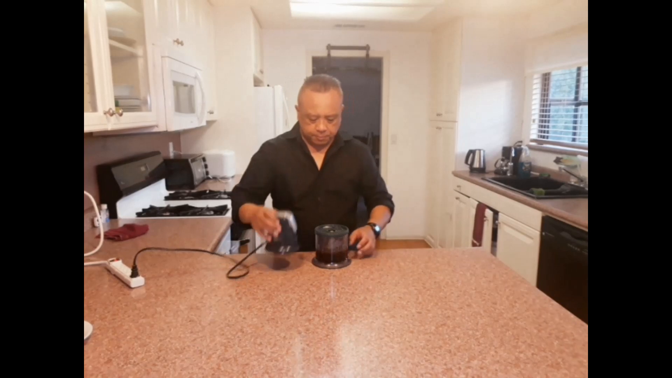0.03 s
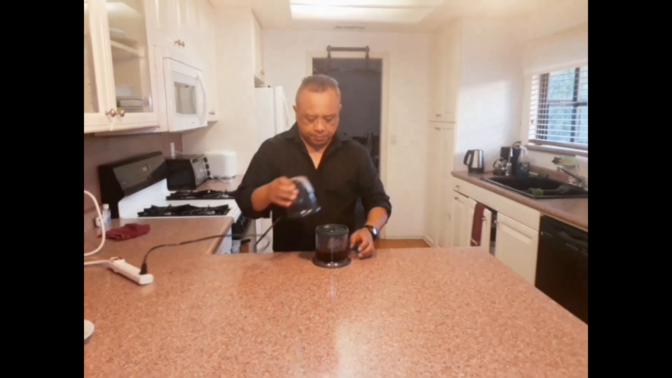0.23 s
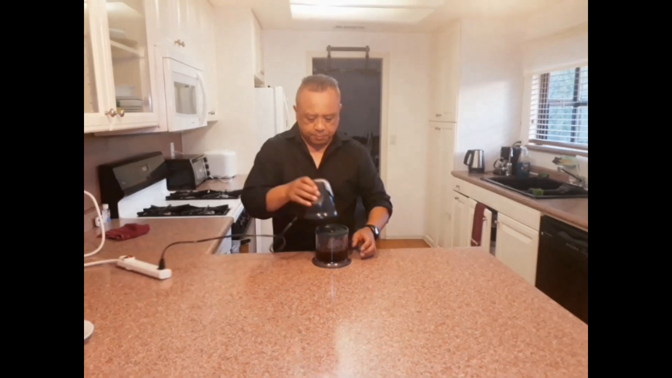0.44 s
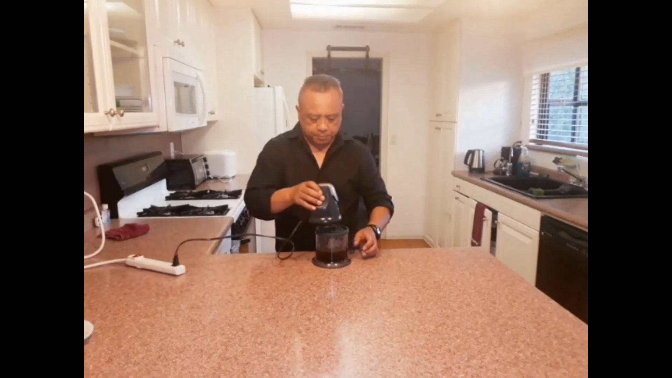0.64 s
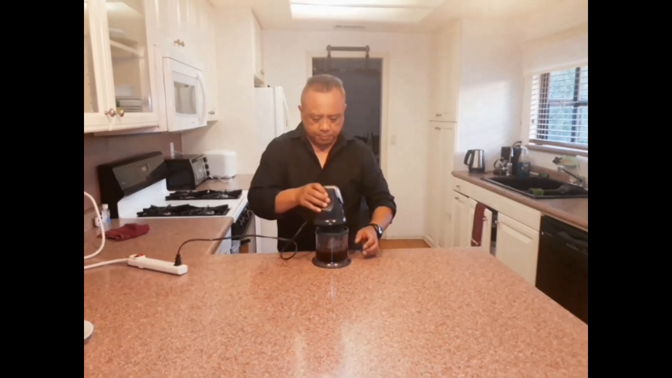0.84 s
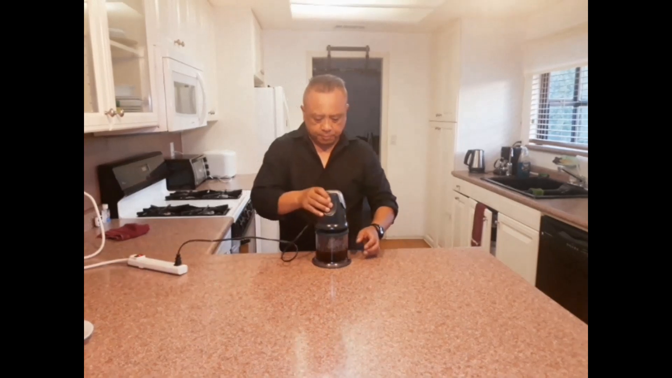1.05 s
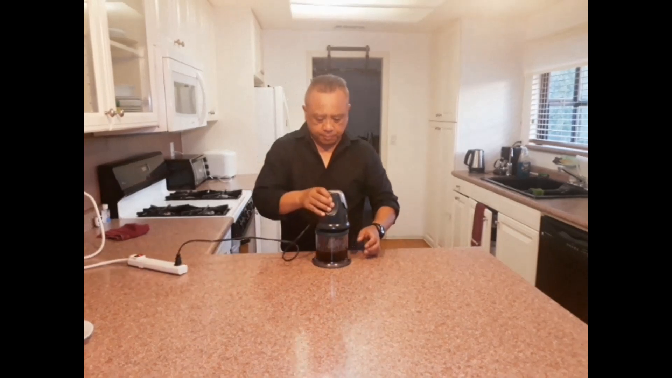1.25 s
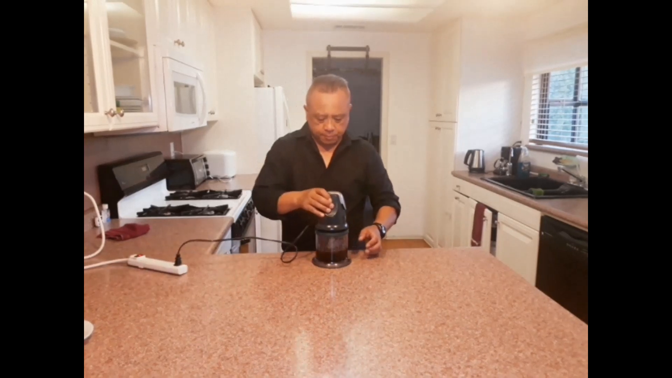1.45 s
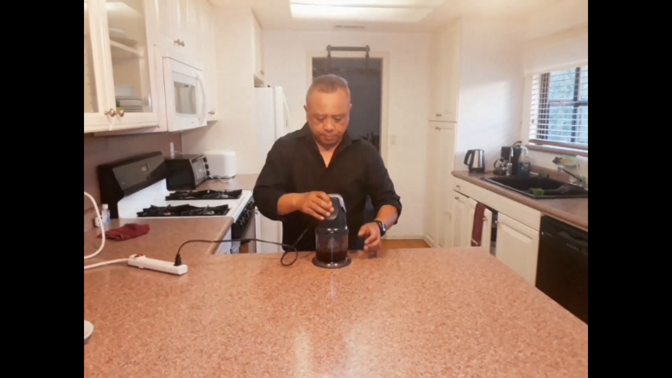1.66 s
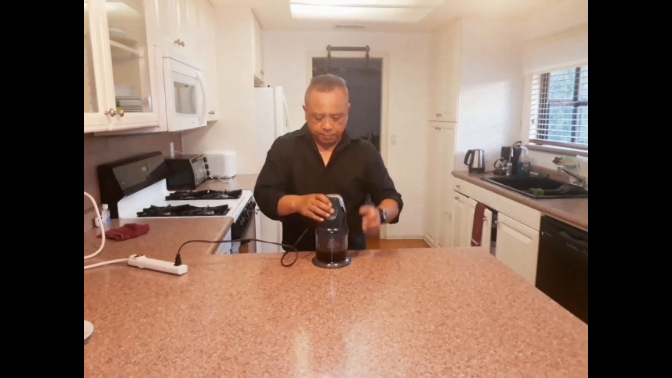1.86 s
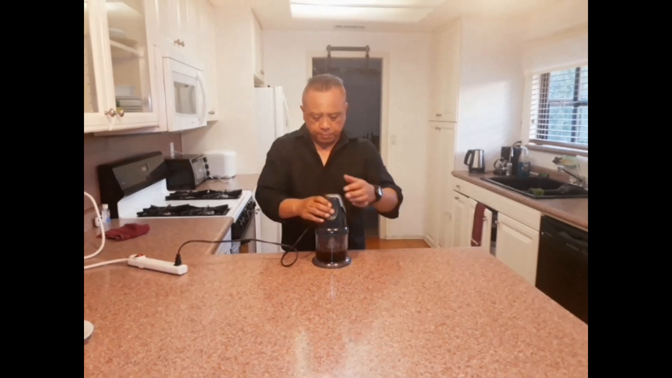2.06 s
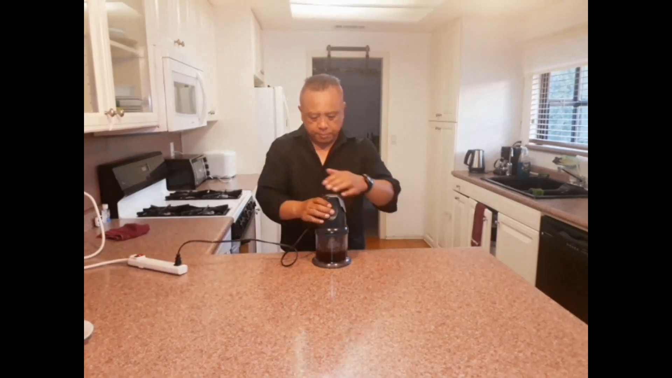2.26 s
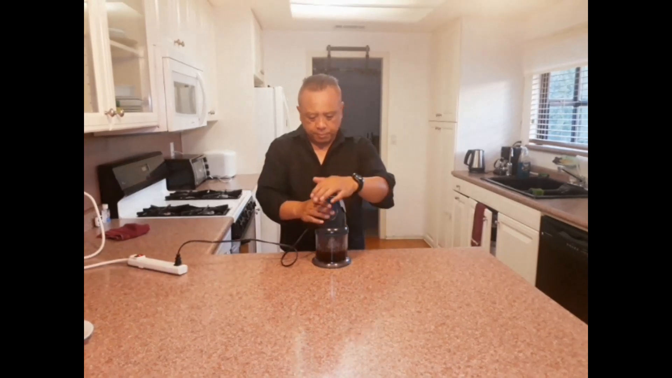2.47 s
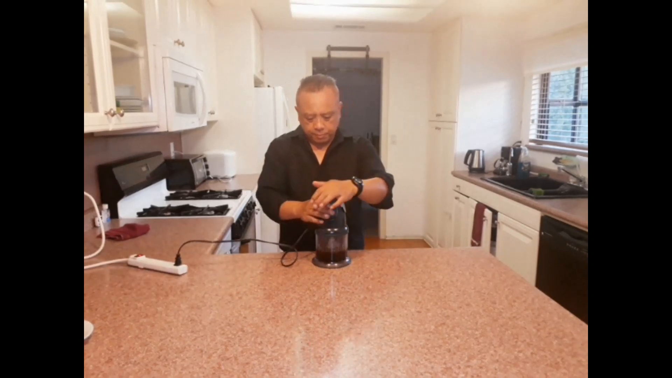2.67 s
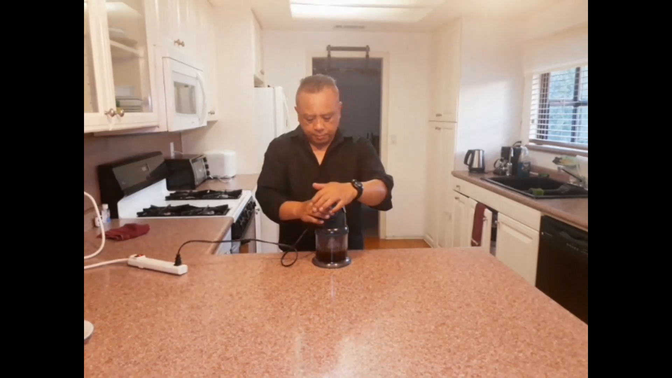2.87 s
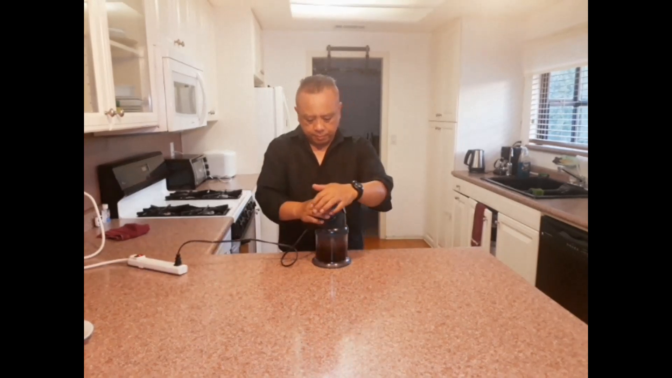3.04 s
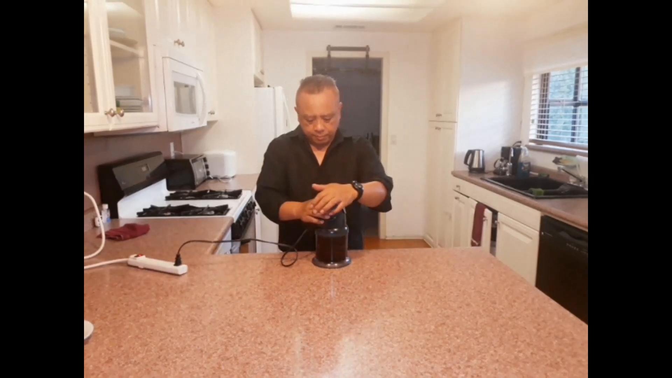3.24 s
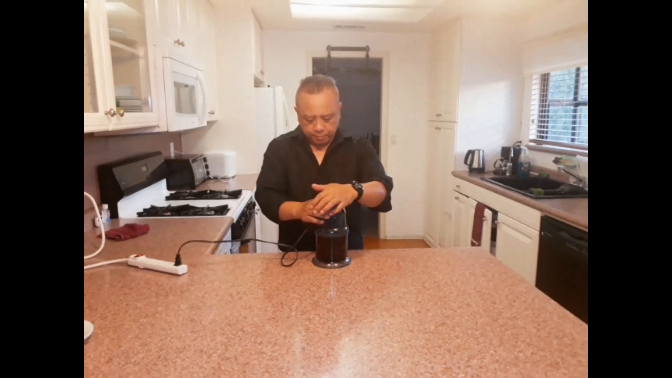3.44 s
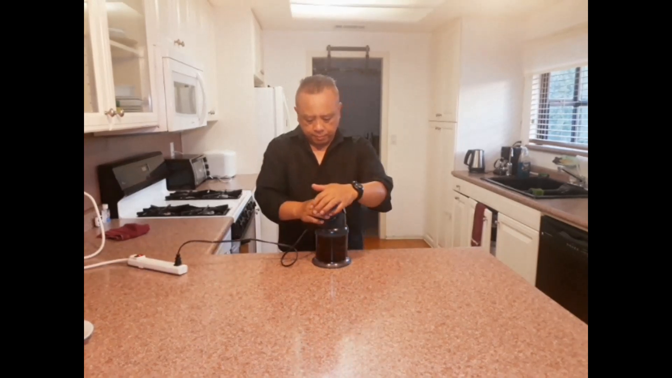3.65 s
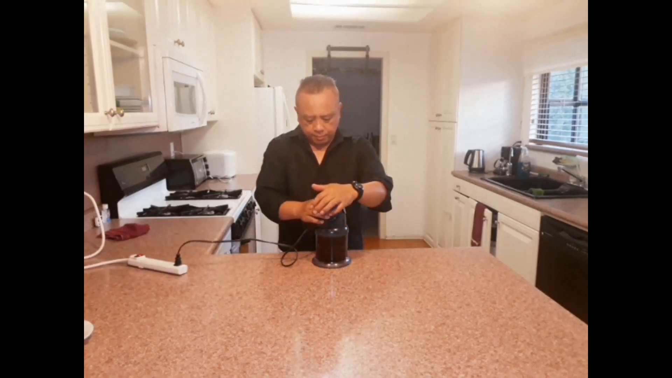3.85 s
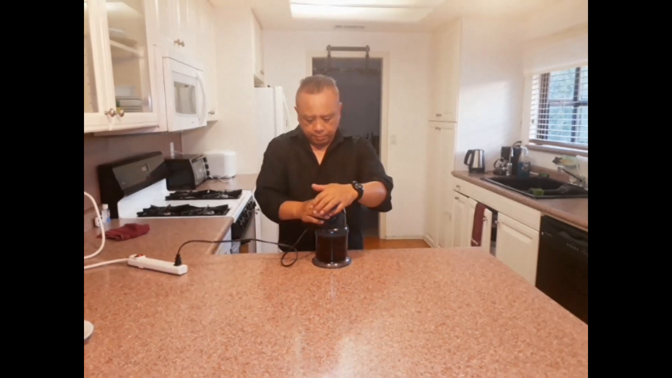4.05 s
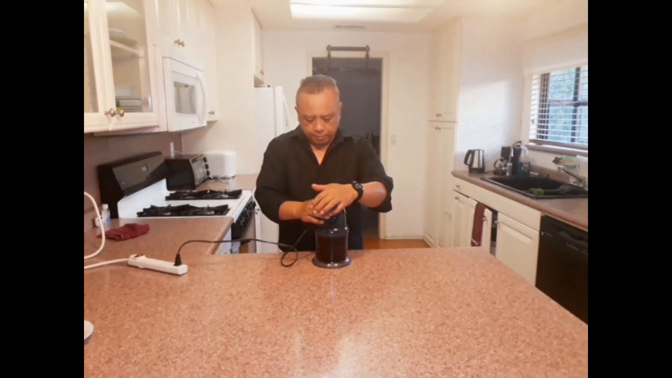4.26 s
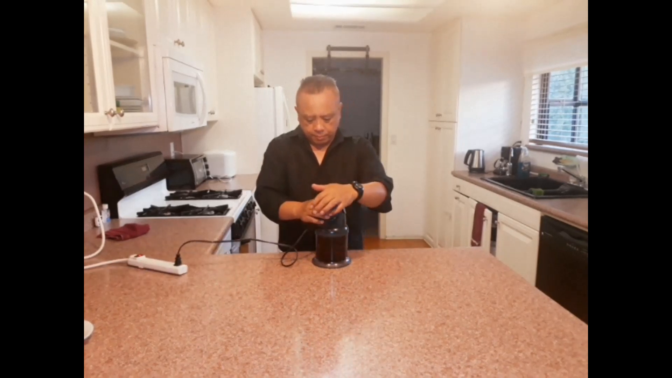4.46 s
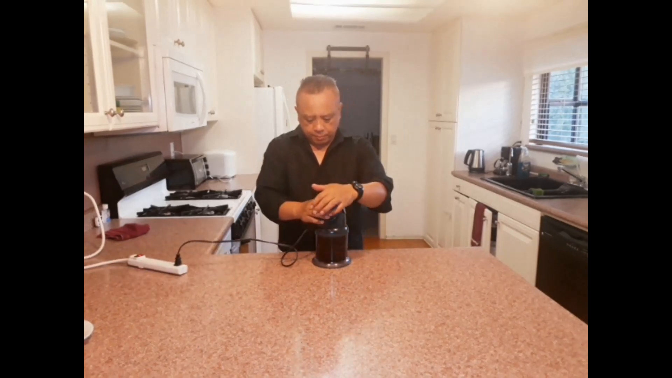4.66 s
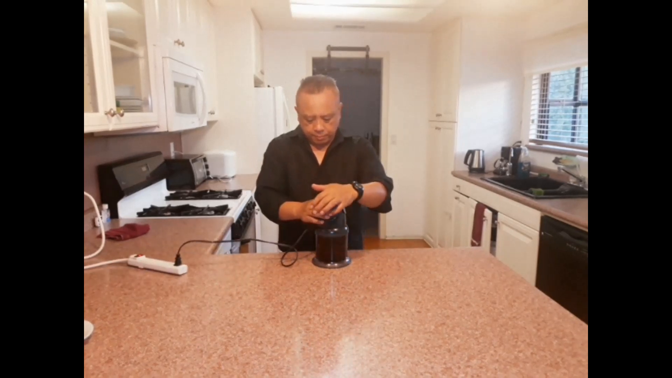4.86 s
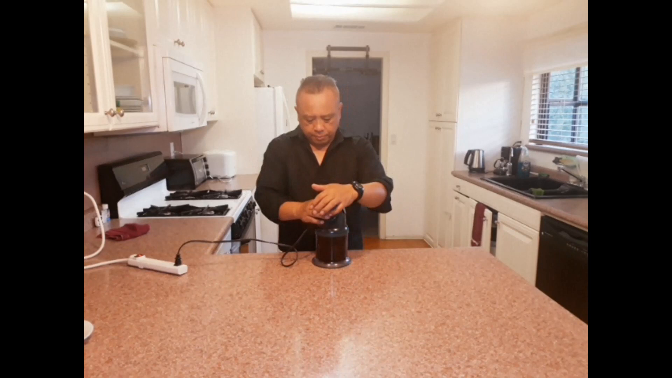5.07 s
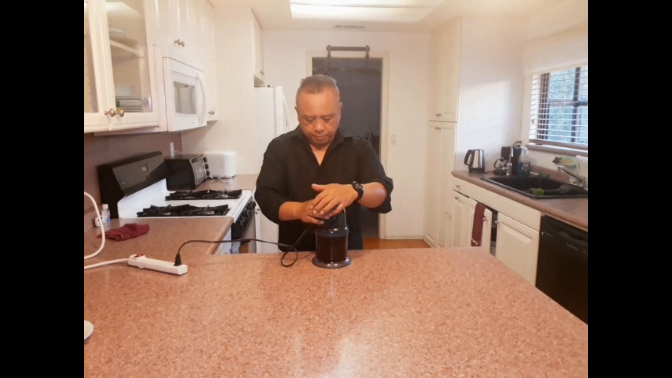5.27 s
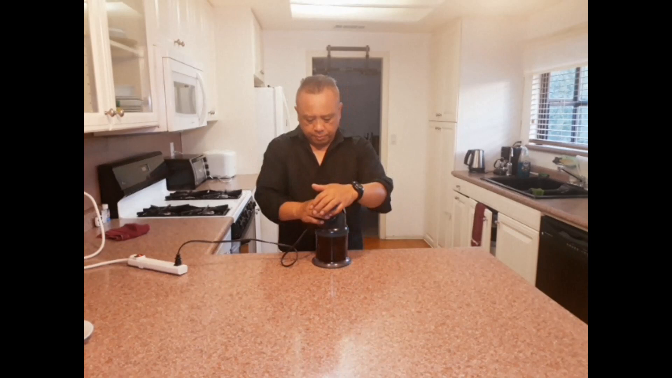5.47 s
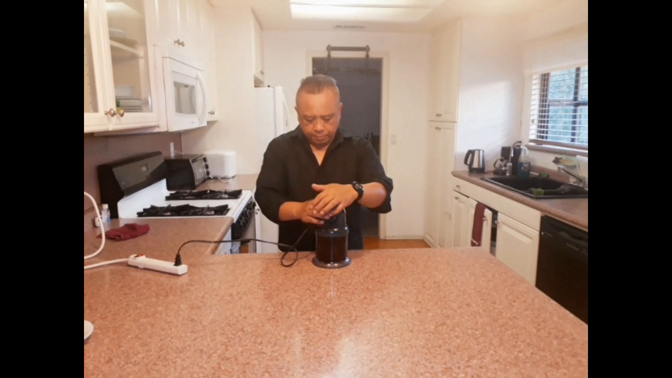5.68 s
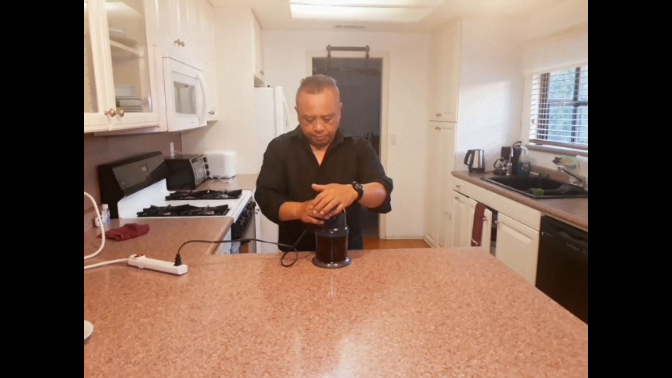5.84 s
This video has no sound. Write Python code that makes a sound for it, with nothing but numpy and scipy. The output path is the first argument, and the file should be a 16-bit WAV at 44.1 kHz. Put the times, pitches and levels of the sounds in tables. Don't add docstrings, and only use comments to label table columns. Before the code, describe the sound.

Heard from a few metres in a small hard-walled room: a brief cable rub, several clustered plastic thumps and clicks with short reflections, then near-quiet over distant appliance drone. A couple of tiny creaks and taps lead into a geared chopper motor, spinning up quickly into a loud harsh buzz with low hum, gritty gear whine, rushing air and churning food. It is still running at the end.

```python
import sys
import numpy as np
from scipy import signal
from scipy.fft import rfft, irfft, next_fast_len
from scipy.io import wavfile
from scipy.ndimage import uniform_filter1d, map_coordinates

SR = 44100
rng = np.random.default_rng(int(sys.argv[2]) if len(sys.argv) > 2 else 0)


def gain_from_decibels(decibels):
    exponent = np.asarray(decibels, float) / 20
    return 10 ** exponent


def bounce(signal):
    frames = np.transpose(np.atleast_2d(signal))
    limited = np.clip(frames, -1, 1)
    pcm = np.round(limited * 32767).astype(np.int16)
    wavfile.write(sys.argv[1], SR, pcm)


N = 260631
T = np.arange(N) / SR


def unit(x):
    return x / np.sqrt(np.mean(np.abs(x) ** 2) + 1e-20)


def along(points, hz):
    f, value = np.transpose(points)
    return np.interp(np.log(hz + 1), np.log(f + 1), value)


def wobble(rate, channels=1):
    knots = int(N * rate / SR) + 4
    return np.array([map_coordinates(rng.standard_normal(knots), [T * rate]) for _ in range(channels)])


def swells(rows):
    return sum(height * np.exp(-((T - s) / half) ** 2) for s, height, half in rows)


def filtered(x, response):
    m = next_fast_len(N + SR // 2)
    return irfft(rfft(x, m) * response(np.fft.rfftfreq(m, 1 / SR)), m)[..., :N]


def modes(table, f):
    return sum((-1) ** k * gain_from_decibels(db) * 1j * f * w / (c * c - f * f + 1j * f * w)
               for k, (c, w, db) in enumerate(table))


# frequency in Hz, left-right likeness from 0 to 1.
LIKENESS = [(60, 0.089), (150, 0.95), (380, 0.76), (950, 0.051), (2380, 0.455), (5980, 0.01), (15000, 0.02)]


def paired(two):
    turn = lambda hz: np.arccos(np.clip(along(LIKENESS, hz), -1, 1)) / 2
    mid, side = filtered(two, lambda hz: np.array([np.cos(turn(hz)), np.sin(turn(hz))]))
    return np.array([mid + side, mid - side])


def rush(spectrum, patchy_db):
    z = signal.stft(rng.standard_normal((2, N)), nperseg=512)[2]
    field = uniform_filter1d(rng.standard_normal(z.shape[1:]), size=6, axis=0)
    field = uniform_filter1d(field, size=10, axis=1)
    two = signal.istft(z * gain_from_decibels(patchy_db * unit(field)), nperseg=512)[1][:, :N]
    low_cut = lambda hz: np.minimum(1, 1.5 * hz / spectrum[0][0]) ** 2
    return unit(paired(filtered(two, lambda hz: gain_from_decibels(along(spectrum, hz)) * low_cut(hz))))


# frequency in Hz, density in dB per Hz.
RUMBLE = [(13, -76.5), (25, -46), (60, -15.5), (110, -12.5), (170, -10), (350, -8), (550, -15.5),
          (1200, -26), (1560, -54), (2640, -120)]
# frequency in Hz, width in Hz, level in dB.
ROOM_MODES = [(122, 14, -2), (172, 18, -2), (245, 16, 2), (352, 18, 2), (420, 16, -3), (512, 16, 1),
              (650, 25, -1)]
# frequency in Hz, density in dB per Hz.
MIC_HISS = [(600, -3), (1000, -1), (1800, -5), (2200, -13), (3200, -15.5), (4500, -11.5), (7600, -12),
            (8200, -28.5), (15800, -21)]


def room_tone():
    drone = filtered(rush(RUMBLE, patchy_db=.4), lambda f: 1 + .8 * np.abs(modes(ROOM_MODES, f)))
    return gain_from_decibels(-52 + 0.37 * wobble(2.56)) * unit(drone) + gain_from_decibels(-64.5) * rush(MIC_HISS, patchy_db=1.3)


# middle in seconds, scrape level in dB, half length in seconds.
CORD_PULLS = [
    (.1, -66, 0.0544),
    (0.471, -50.5, 0.1788),
]


def pulls(lead_s):
    return sum(gain_from_decibels(db) * np.exp(-((T + lead_s - s) / half) ** 2) for s, db, half in CORD_PULLS)


# frequency in Hz, density in dB per Hz.
CORD_SCRAPE = [(290, -32), (500, -5), (766, 5), (937, -8), (1060, -5), (1390, -7), (2120, -6.5), (2420, -3),
               (2690, -7), (4870, -8.5), (8500, -19.5), (11000, -51.5), (18700, -120)]


def cord():
    sizzle_strength = unit(pulls(lead_s=.03) ** 1.56)
    sizzle_strength = gain_from_decibels(-56.5) * sizzle_strength / sizzle_strength.max()
    grain = unit(gain_from_decibels(1.3 * wobble(153.5) + 0.3 * wobble(24)))
    sizzle = rush([(7000, -40), (9000, -4), (12000, -7), (15000, 5), (16000, -2.0)], patchy_db=-1)
    scrape = pulls(0) * gain_from_decibels(2.5) * rush(CORD_SCRAPE, patchy_db=1.5)
    return grain * (scrape + sizzle_strength * sizzle)


# start in seconds, peak level in dB, frequency in Hz.
CREAKS = [
    (0.0654, -52.5, 7250),
    (2.6254, -49, 7300),
    (2.9113, -55.5, 7020),
]


def creaks():
    out, t = np.zeros(N), np.arange(SR // 40) / SR
    for s, db, hz in CREAKS:
        flutter = np.cumsum(rng.normal(0, 0.14, len(t)))
        tick = np.sin(2 * np.pi * hz * t + flutter) * np.minimum(t / .0015, 1)
        out[round(s * SR):][:len(t)] += gain_from_decibels(db + 5 - 60 * t / 0.012) * tick
    return out * gain_from_decibels([[2.5], [-6]])


# start in seconds, thump level in dB, click level in dB,
# hardness as top frequency in Hz, scrape length in seconds.
CONTACTS = [(1.117, -34.5, -46, 1100, 0.014), (1.135, -42.5, -57, 900, 0.013),
            (1.167, -39.5, -64.5, 800, .012), (1.422, -38, -57, 900, .02), (1.439, -36, -48, 1410, 0.018),
            (1.464, -23.5, -51, 1200, 0.016), (1.474, -19.5, -44.5, 2390, 0.053),
            (1.467, -55.5, -60, 7000, 0.033), (1.495, -26, -66, 2000, 0.012),
            (1.649, -39, -37.5, 15000, 0.077), (1.666, -27.5, -38, 15000, 0.0243),
            (1.702, -24.5, -28.5, 5200, 0.01135), (1.716, -44, -46.5, 14000, 0.068),
            (1.734, -34, -37.5, 2650, 0.0091), (2.809, -59, -57.5, 3600, 0.0198),
            (2.824, -49, -60.5, 2500, .04), (3.002, -37, -43, 2000, 0.025)]
# frequency in Hz, gain in dB.
PLASTIC_TONE = [(300, -1), (700, 8.5), (1000, 0.5), (1350, 1.5), (2000, -0.5), (2800, -5.5), (3800, 2),
                (6700, -6), (8900, -20), (12000, -12.5), (16000, -13.5)]
# frequency in Hz, width in Hz, level in dB.
WORKTOP = [(45, 40, -19), (80, 30, -11), (150, 40, -12), (213, 25, -8), (325, 24, 0), (560, 70, -15),
           (1100, 300, -28)]


def knocks():
    clicks, blows, t = np.zeros(N + SR), np.zeros(N + SR), np.arange(SR // 10) / SR
    for s, thump_db, click_db, top_hz, length_s in CONTACTS:
        at = round(s * SR)
        rough_db = 2.78 * rng.standard_normal(len(t)).repeat(40)[:len(t)]
        scrape = gain_from_decibels(-60 * t / length_s + rough_db) * rng.standard_normal(len(t))
        soft = signal.butter(4, min(top_hz, SR / 2.2), fs=SR)
        click_gain = gain_from_decibels(click_db + 9.5) * np.sqrt(9000 / top_hz)
        clicks[at:][:len(t)] += click_gain * signal.lfilter(*soft, scrape)
        blows[at:][:len(t)] += gain_from_decibels(thump_db + 24.5) * t / 0.0002033 * np.exp(-t / 0.0003075)
    ringing = filtered(clicks[:N], lambda hz: gain_from_decibels(along(PLASTIC_TONE, hz)))
    return ringing + filtered(blows[:N], lambda f: modes(WORKTOP, f))


# frequency in Hz, 60 dB decay time in seconds.
KITCHEN_DECAY = [(100, 0.392), (400, 0.283), (2000, 0.457), (6000, 0.434), (14000, 0.267)]


def kitchen(x):
    x = filtered(x, lambda hz: hz / np.hypot(hz, 330))
    wet, step = np.zeros((2, N + SR)), SR // 4
    for at in range(SR // 10, N, step):
        if np.abs(x[at:at + step]).max() < 1e-4:
            continue
        hz, t, z = signal.stft(rng.standard_normal((2, SR // 2)), SR, nperseg=256)
        decay = gain_from_decibels(-60 * t / along(KITCHEN_DECAY, hz)[:, None])
        tail = paired(signal.istft(z * decay, SR, nperseg=256)[1])[:, :SR // 2]
        answer = signal.fftconvolve(x[None, at:at + step], tail / np.linalg.norm(tail[0]), axes=1)
        wet[:, at + 200:][:, :answer.shape[1]] += answer
    return wet[:, :N]


START_S, FREE_HZ = 2.995, 350
# turns per second, time constant in seconds.
SPEED_LACK = [(47, .029), (178.5, .201), (33, 2.3)]
# middle in seconds, turns per second, half length in seconds.
SPEED_SNAGS = [
    (3.1, 6, .03),
    (3.19, -5, .05),
]


def shaft():
    since = np.maximum(T - START_S, 0)
    lacking = sum(lack * np.exp(-since / tau) for lack, tau in SPEED_LACK)
    return (T >= START_S) * (FREE_HZ + swells(SPEED_SNAGS) - lacking)


# time in seconds, load in dB.
FOOD_LOAD = [
    (2.995, -1),
    (3.3, 0.83),
    (3.5, -0.59),
    (4.15, .5),
    (4.45, -0.66),
    (4.65, .5),
    (5.03, -0.6),
    (5.13, -3),
    (5.91, -3.5),
]


def driven(layer):
    db, by_speed, by_load, attack_s = layer
    load_db = np.interp(T, *np.transpose(FOOD_LOAD), left=0)
    rise = 1 - np.exp(-(np.maximum(T - START_S, 0) / attack_s) ** 2)
    return gain_from_decibels(db + by_load * load_db) * (shaft() / FREE_HZ) ** by_speed * rise


# frequency in Hz, density in dB per Hz.
JAR_SHAKE = [(30, -43.5), (60, -34), (85, -33.5), (115, -36.5), (140, -15.5), (200, -13.5), (300, -2.5),
             (530, -4), (620, -5.5), (1180, -9.5), (2000, -6), (2600, -43.5), (4400, -120)]
# frequency in Hz, width in Hz, level in dB.
COUNTER_MODES = [(152, 20, 7), (216, 20, -3), (278, 25, -4), (325, 25, 0), (365, 16, -2), (418, 25, -2),
                 (543, 20, -2), (700, 90, -12), (941, 30, -6)]
# frequency in Hz, density in dB per Hz.
FOOD_CHURN = [(530, -63.5), (800, -1.5), (1190, -2), (2390, -1), (2820, -4.5), (3830, -8), (4580, -8.5),
              (5210, -3.5), (9500, -15), (12400, -24.5), (20900, -120)]
# frequency in Hz, width in Hz, level in dB.
HEAD_PANELS = [(2395, 134, -5), (3515, 75, 4), (4489, 96, 4.5), (5990, 47, -5.5)]
# frequency in Hz, density in dB per Hz.
COOLING_AIR = [(4410, -2), (7500, 4), (8500, -20), (9200, -11), (11900, -4.5), (13700, -5), (15900, -8)]


def roar():
    struck = np.clip(wobble(60) - 1.1, 0, .5) + .6 * np.clip(wobble(160) - 1.3, 0, .7)
    surge_db = .5 * wobble(6)
    shaken = filtered(rush(JAR_SHAKE, patchy_db=0.5), lambda f: .5 + np.abs(modes(COUNTER_MODES, f)))
    churned = filtered(rush(FOOD_CHURN, patchy_db=0.94), lambda f: 1 + 0.917 * np.abs(modes(HEAD_PANELS, f)))
    jar = driven((-28.5, 0.4335, 0.9575, .014)) * gain_from_decibels(1.5 + surge_db + 1.97 * struck) * unit(shaken)
    food = driven((-26.5, 1.01, 0.6458, 0.0384)) * gain_from_decibels(0.5 + surge_db + 4.55 * struck) * unit(churned)
    fan = driven((-31, 1, 1.83, 0.0579)) * gain_from_decibels(1.5 + surge_db + 4.1 * struck)
    return jar + food + fan * rush(COOLING_AIR, patchy_db=1.48)


# frequency in Hz, width in Hz, level in dB.
ROCKING = [(283.24, 22.05, -5.5), (324.18, 13.81, 0.5)]
# turns per shaft turn, level in dB relative to the hum.
GEAR_ORDERS = [(.667, -20), (1.333, -23), (1.667, -20.5), (2, -18)]
# middle in seconds, change in dB, half length in seconds.
FOOD_BALANCE = [(3.22, -7, 0.055), (3.49, -8.5, 0.0395), (3.55, 6, 0.023), (3.62, -8.5, 0.056),
                (4.19, -3, 0.034), (4.45, -2.5, 0.074), (4.73, -10, 0.066), (4.88, -6, 0.107),
                (5.25, -10, .1), (5.62, -8, .05), (5.91, -8.5, 0.057)]
# middle in seconds, change in dB, half length in seconds.
WHEEL_BINDS = [
    (3.8, 6, 0.09),
    (4.05, 6.5, 0.103),
    (4.35, 7.5, .15),
    (4.75, 1, .12),
    (5.03, -11, 0.076),
    (5.25, -4, 0.114),
    (5.55, 4, 0.125),
    (5.85, 1.5, 0.078),
]


def hum():
    speed_hz, planet_order = shaft(), .84
    rocking = lambda order: np.abs(modes(ROCKING, order * speed_hz))
    turn = 2 * np.pi * np.cumsum(speed_hz) / SR
    tone = np.sqrt(2) * gain_from_decibels(0.48 * wobble(25.0)) * np.sin(turn + 0.258 * wobble(33))
    gears = sum(gain_from_decibels(db + 1.2 * wobble(5.967)) * np.sin(order * turn + .5 * wobble(14))
                for order, db in GEAR_ORDERS)
    planet = np.sqrt(2) * np.sin(planet_order * turn + .8 * wobble(18))
    planet = planet * rocking(planet_order) * gain_from_decibels(swells(WHEEL_BINDS) + 2.5 * wobble(14))
    unbalance = driven((-18, 2, 2.5, 0.0419)) * rocking(1) * gain_from_decibels(swells(FOOD_BALANCE)) * (tone + gears)
    return (unbalance + driven((-32.5, 0.5, -0.47, 1.5)) * planet) * gain_from_decibels([[.6], [-.6]])


TEETH, BARS = 13.45, 14
# multiple of the tooth rate, blur in Hz, level in dB.
TOOTH_LINES = [(.5, 350, -23), (.9, 494, -7.5), (1, 220, -2.5), (1.9, 707, -10), (2.018, 499.9, -5),
               (2.97, 905, -9), (4, 890, -16.5)]
# middle in seconds, change in dB, half length in seconds.
HARD_BITES = [
    (3.067, 6.5, 0.00466),
    (3.088, -11.5, 0.0089),
    (3.128, 3.5, 0.0056),
    (3.155, 3, 0.0062),
    (3.27, 1, .05),
    (4.5, 2, 0.164),
]
# frequency in Hz, gain in dB.
HOUSING_TONE = [(300, -15), (1500, -19.5), (2400, 8), (3000, 3), (4500, -7), (5500, 4.5), (7500, 6.5),
                (8300, -4), (9800, -10.5), (11200, -2.5), (14000, -6), (16000, -2.5)]


def whine():
    speed_hz = shaft()
    turn = 2 * np.pi * np.cumsum(speed_hz) / SR
    mesh = 0
    for k, blur_hz, db in TOOTH_LINES:
        load = gain_from_decibels(1.3 * wobble(45))
        blur = wobble(blur_hz, channels=2) + 1j * wobble(blur_hz, channels=2)
        core = 0.82 * np.exp(1j * 1.816 * wobble(40, channels=2))
        runout = 1 + 0.563 * np.cos(turn + k) + 0.179 * np.cos(turn / 2 + k)
        audible = k * TEETH * speed_hz < 17000
        line = np.real((blur + core) * np.exp(1j * k * TEETH * turn))
        mesh = mesh + gain_from_decibels(db) * audible * load * runout * line
    brushes = gain_from_decibels(4.75 * wobble(11, channels=2)) * np.sin(BARS * turn + 1.41 * wobble(36, channels=2))
    teeth = driven((-26.8, 1.474, 1.6, 0.0444)) * gain_from_decibels(swells(HARD_BITES)) * mesh
    both = teeth + driven((-29, 7, 0.67, 0.04)) * brushes
    return paired(filtered(both, lambda hz: gain_from_decibels(along(HOUSING_TONE, hz))))


def standing(x, depth_db, spacing_hz):
    knots = rng.standard_normal((2, int(SR / 2 / spacing_hz) + 4))
    ripple = lambda hz: np.array([map_coordinates(k, [hz / spacing_hz]) for k in knots])
    small = lambda hz: 1 / np.sqrt(1 + np.minimum((125 / (hz + 1)) ** 8, 3))
    return filtered(x, lambda hz: small(hz) * gain_from_decibels(depth_db * np.clip(hz / 500 - 1, 0, 1) * ripple(hz)))


def scene():
    hits = knocks()
    chopper = standing(roar() + hum() + whine(), depth_db=2.1, spacing_hz=22)
    return room_tone() + cord() + creaks() + hits + kitchen(hits) + chopper


def roll_off(x):
    return signal.sosfilt(signal.butter(12, 16040, fs=SR, output="sos"), x)


# frequency in Hz, left minus right in dB.
MIC_LEAN = [(60, 0), (150, 1), (380, 0.65), (950, 1.5), (2380, 1), (4400, -4), (8100, 5.5), (15000, 10)]


def record(dry):
    level = lambda hz: gain_from_decibels(np.outer([.5, -.5], along(MIC_LEAN, hz)))
    delay = lambda hz: np.exp(np.outer([1j, -1j], np.pi * hz * 45e-6))
    mix = filtered(dry, lambda hz: level(hz) * delay(hz) * (hz < 15880))
    return roll_off(mix)


dry = scene()
out = record(dry)
bounce(out)
```